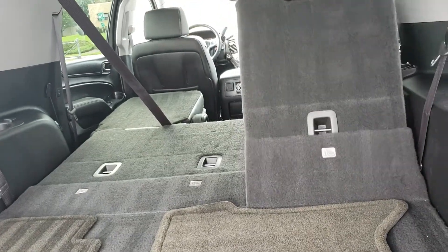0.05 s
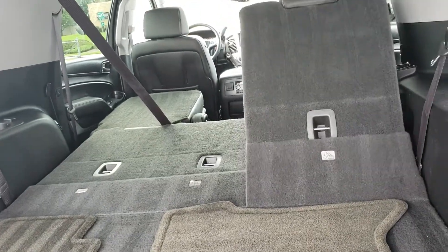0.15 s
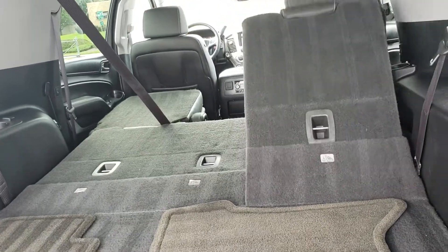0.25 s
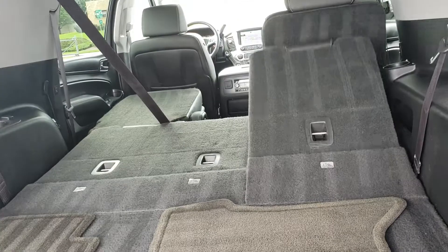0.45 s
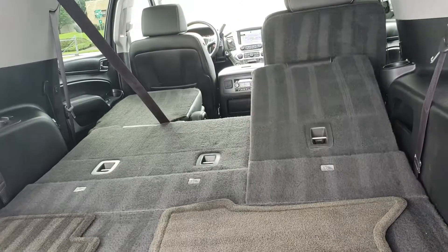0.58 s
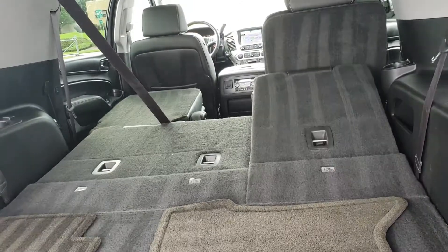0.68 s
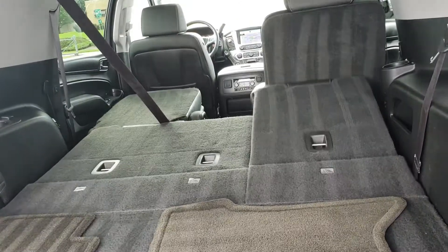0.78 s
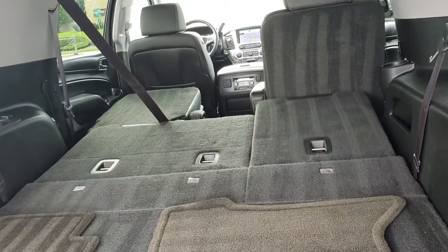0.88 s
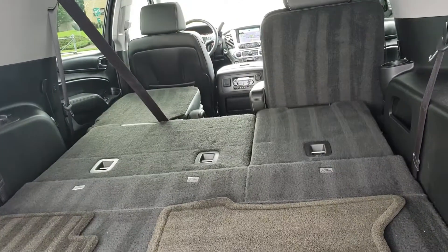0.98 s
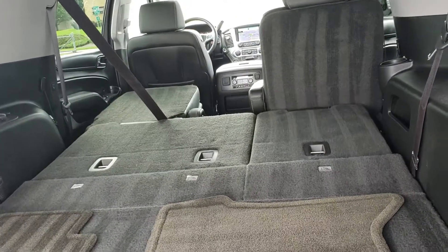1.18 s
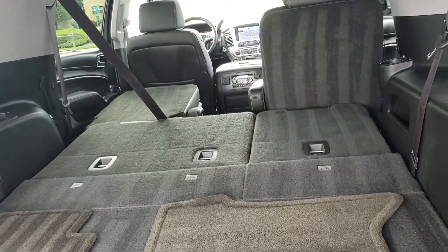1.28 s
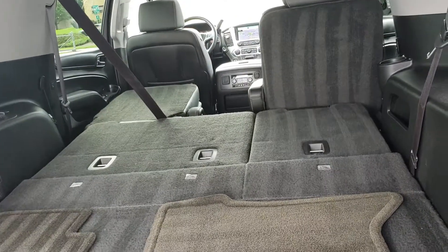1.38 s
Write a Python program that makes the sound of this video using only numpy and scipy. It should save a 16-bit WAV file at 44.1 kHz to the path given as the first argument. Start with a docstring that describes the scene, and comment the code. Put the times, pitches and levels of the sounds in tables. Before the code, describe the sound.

A seat latch snaps open with a sharp metallic clack, then the backrest folds with soft thumps

```python
"""A spring latch snaps open in a closed cabin: sharp noise bursts and short decaying steel tones.
The seat frame and cabin boom after it, as slowly swelling low sines behind a dull knock.
The backrest of the motorised seat folds flat: soft low noise pulses with a few faint ticks.
Behind lie wavering hum tones, filtered cabin rumble and a hiss that thins out, then returns.
A thin whistle, a narrow noise band on a climbing pitch, rises at the end."""
import sys
import numpy as np
from scipy import signal
from scipy.fft import rfft, irfft
from scipy.io import wavfile
from scipy.ndimage import uniform_filter1d

SR = 44100
rng = np.random.default_rng(int(sys.argv[2]) if len(sys.argv) > 2 else 0)


def to_wav(s):
    """Save 16-bit WAV."""
    ch = np.atleast_2d(s).T  # columns
    pcm = np.round(np.clip(ch, -1, 1) * 32767)  # PCM
    wavfile.write(sys.argv[1], SR, pcm.astype(np.int16))


N = 63945
T = np.arange(N) / SR
HZ = np.fft.rfftfreq(N, 1 / SR)

# All spectra are relative: noise() scales the result to an rms of one.
# Cabin rumble spectrum. Each row: frequency in Hz, density in dB per Hz.
RUMBLE_SPECTRUM = [(15, -47), (25, -8), (38, -4), (50, -3.5), (102, -3), (150, -3), (217, -7.5),
                   (354, -12.5), (451, -9), (531, -14.5), (754, -20), (1260, -25), (1600, -27.5),
                   (2000, -26.5), (2690, -36.5), (4490, -40), (5730, -49.5), (7510, -48.5), (8800, -63),
                   (16000, -84)]
# Rumble level ahead of the patches. Each row: time in seconds, level in dB.
RUMBLE_LEVEL = [(0, -37), (.35, -35.5), (.7, -38), (.92, -37.5), (1.2, -39.5), (1.45, -35)]
# Left-right likeness of all noise, ahead of the side arrival. Each row: frequency in Hz, coherence.
EAR_COHERENCE = [(60, .84), (150, .9), (380, 0.74), (950, -0.081), (1500, -0.056), (2400, 0.089),
                 (15000, -0.016)]
# Hiss spectrum. Each row: frequency in Hz, density in dB per Hz.
HISS_SPECTRUM = [(500, 0), (2000, 4.5), (4300, -6.5), (7500, -9), (9000, -13.5), (12000, -11), (16000, -18)]
# Hiss level. Each row: time in seconds, level in dB.
HISS_LEVEL = [(0, -55.5), (.12, -55), (.3, -56.5), (.5, -63.5), (.9, -65), (1.2, -71.5), (1.45, -59.5)]
# Hum tones. Each row: mean frequency in Hz, rms level in dB.
HUM_TONES = [(113, -50), (145, -47), (243, -55), (262, -52.5), (355, -53), (450, -57.5), (2840, -80.5)]
# Whistle course. Each row: time in seconds, centre frequency in Hz, level in dB.
WHISTLE_COURSE = [(1.26, 9360, -94), (1.33, 10400, -84), (1.40, 11700, -73), (1.45, 12100, -65)]
# Soft blows on the upholstery. Each row: start in seconds, level in dB, swell in seconds, t60 in seconds.
THUDS = [(0.218, -29.5, 0.0096, 0.36), (0.51, -40, 0.014, 0.2), (0.992, -32.5, 0.0094, 0.24)]
# Thud spectrum. Each row: frequency in Hz, density in dB per Hz.
THUD_SPECTRUM = [(30, -19), (60, -4), (105, 0), (190, -2.5), (330, 0), (500, -8), (800, -14), (1500, -26),
                 (4000, -43), (16000, -80)]
# Deep heaves of the backrest. Each row: start in seconds, level in dB, swell in seconds, t60 in seconds.
HEAVES = [(0.217, -32.5, 0.013, 0.13), (0.519, -32, 0.047, 0.11), (1.015, -30, 0.021, 0.21)]
# Heave spectrum. Each row: frequency in Hz, density in dB per Hz.
HEAVE_SPECTRUM = [(20, -32), (45, -12), (80, -3.5), (115, -4.5), (170, -18), (400, -53), (2000, -89)]
# Hinge and trim ticks. Each row: start in seconds, level in dB.
TICKS = [(0.352, -54), (0.491, -53), (0.515, -50.5), (0.654, -55), (0.825, -56), (0.952, -55), (1.272, -64),
         (1.347, -61)]
# Tick spectrum. Each row: frequency in Hz, density in dB per Hz.
TICK_SPECTRUM = [(300, -10), (1200, 7), (2700, 7), (5000, -3), (7500, -5.5), (10000, -16.5), (16000, -21)]
# Spectrum of the first knock. Each row: frequency in Hz, density in dB per Hz.
KNOCK_SPECTRUM = [(40, -22), (110, -0.5), (200, -7.5), (380, 2), (520, -2), (700, -19), (1250, -5.5),
                  (1700, -20), (6000, -62)]
# Modes of frame and cabin. Each row: frequency in Hz, level in dB, t60 in seconds, swell in seconds.
BOOM_MODES = [(118.6, -26, 0.51, 0.044), (241.7, -27.5, 0.46, .034), (306, -26.5, 0.42, 0.033),
              (357.6, -24.5, 0.13, 0.034), (456.4, -27.5, 0.17, 0.019), (547.2, -32.5, 0.33, .014)]
# Latch blows. Each row: start in seconds, level in dB ahead of CLATTER_GAIN_DB.
LATCH_BLOWS = [(0.2156, -5.5), (0.2163, -0.5), (0.221, -5.5)]
# Clatter spectrum. Each row: frequency in Hz, density in dB per Hz.
CLATTER_SPECTRUM = [(240, -21), (400, -4), (700, -20.5), (1100, -11), (1500, -7.5), (2000, 6), (2800, 3),
                    (3600, 3), (4900, -3), (6100, -8), (7600, -10), (8800, -16.5), (16000, -20)]
# Clatter decay. Each row: frequency in Hz, t60 in seconds.
CLATTER_DECAY = [(500, 0.15), (1500, 0.09), (3500, 0.065), (7000, 0.069), (14000, 0.067)]
# Clatter lean. Each row: frequency in Hz, left minus right in dB.
CLATTER_LEAN = [(600, 2), (1300, -4), (2400, -0.5), (4400, 0.5), (8000, 8.5), (14000, -3)]
# Steel modes. Each row: frequency in Hz, level in dB ahead of STEEL_GAIN_DB, t60 in seconds,
# left minus right in dB.
STEEL_MODES = [(856, -31, .17, -11), (1692, -26, .12, -1), (1778, -21, .1, -10), (1960, -22, .085, -15),
               (2233, -20, .08, -2), (2638, -19, .085, -11), (2840, -20, .095, -8), (3413, -18, .08, 9),
               (4660, -26, .07, 11), (5286, -17, .07, 3), (5895, -24, .06, 10), (6610, -24, .075, 14),
               (7350, -32, .065, -1), (9405, -37, .1, 2)]

SIDE_SHARE, SIDE_LAG_S = 0.13, 0.000426
PATCH_RMS_DB = 1.5
HUM_WANDER_RMS_HZ, HUM_WANDER_RATE_HZ = 2.87, 7.34
HUM_FLUTTER_RMS, HUM_FLUTTER_RATE_HZ = 0.48, 9.3
WHISTLE_WIDTH_HZ = 380
TICK_RISE_S, TICK_T60_S = 0.004, 0.11
KNOCK_DB, KNOCK_RISE_S, KNOCK_T60_S = -22.5, 0.0022, 0.11
BOOM_START_S, BOOM_LEFT_LAG_S = 0.2175, 0.00006
CLATTER_GAIN_DB, CLATTER_RISE_S = -10.5, 0.00081
TAIL_DB, TAIL_T60_S = -33, 0.39  # level relative to the clatter
STEEL_GAIN_DB, STEEL_RISE_S = -2, 0.003
CEILING, BAND_EDGE_HZ = 0.77, 16300


def amp(db):
    """Decibels to gain."""
    return 10 ** (np.asarray(db) / 20)


def unit(x):
    """Scales to an rms of one."""
    return x / np.sqrt(np.mean(x ** 2) + 1e-20)


def by_hz(points, hz):
    """Reads a table on a log-frequency axis."""
    f, value = np.transpose(points)
    return np.interp(np.log(hz + 1), np.log(f + 1), value)


def by_time(points, axis=1):
    """Reads one column of a control curve at every sample."""
    columns = np.transpose(points)
    return np.interp(T, columns[0], columns[axis])


def fade(t, t60):
    """Exponential decay from time zero, 60 dB in t60."""
    return np.exp(-np.log(1000) * np.maximum(t, 0) / t60)


def strike(start, rise, t60):
    """Envelope that swells linearly from the start, then dies away."""
    swell = np.clip((T - start) / rise, 0, 1)
    return swell * fade(T - start - rise, t60)


def drift(rate_hz):
    """Random motion of rms one, low-passed by a Gaussian of the given width."""
    lowpass = np.exp(-(HZ / rate_hz) ** 2)
    return unit(irfft(rfft(rng.standard_normal(N)) * lowpass, N))


def noise(spectrum):
    """Coloured stereo noise: alike in both ears in the bass, else diffuse with a part from the right."""
    left, other = rfft(rng.standard_normal((2, N)))
    same = np.clip(by_hz(EAR_COHERENCE, HZ), -1, 1)
    from_right = np.clip(SIDE_SHARE, 0, 1) * np.exp(2j * np.pi * HZ * SIDE_LAG_S)
    same = same + (1 - abs(same)) * from_right
    right = same * left + np.sqrt(np.maximum(1 - abs(same) ** 2, 0)) * other
    return unit(irfft(np.array([left, right]) * amp(by_hz(spectrum, HZ)), N))


def cabin():
    """Low rumble with patches drifting over time and frequency, and a soft hiss above it."""
    z = signal.stft(noise(RUMBLE_SPECTRUM), nperseg=1024)[2]
    patches = rng.standard_normal(z.shape[1:])
    patches = uniform_filter1d(patches, size=10, axis=0)  # across frequency
    patches = unit(uniform_filter1d(patches, size=5, axis=1))  # across time
    rumble = signal.istft(z * amp(PATCH_RMS_DB * patches), nperseg=1024)[1][:, :N]
    hiss = noise(HISS_SPECTRUM) * amp(by_time(HISS_LEVEL))
    return rumble * amp(by_time(RUMBLE_LEVEL)) + hiss


def hum():
    """Low machine tones and a faint higher one, each wavering in pitch and strength."""
    out = np.zeros(N)
    for hz, db in HUM_TONES:
        pitch_hz = hz + HUM_WANDER_RMS_HZ * drift(HUM_WANDER_RATE_HZ)
        turns = np.cumsum(pitch_hz) / SR + rng.random()
        flutter = 1 + HUM_FLUTTER_RMS * drift(HUM_FLUTTER_RATE_HZ)
        out += amp(db) * unit(flutter * np.sin(2 * np.pi * turns))
    return out


def whistle():
    """Two slow noises per ear modulate a climbing carrier: a thin, fuzzy, growing whistle."""
    angle = 2 * np.pi * np.cumsum(by_time(WHISTLE_COURSE)) / SR
    ears = []
    for _ in range(2):
        in_phase = drift(WHISTLE_WIDTH_HZ) * np.cos(angle)
        quadrature = drift(WHISTLE_WIDTH_HZ) * np.sin(angle)
        ears.append(in_phase + quadrature)
    started = T > WHISTLE_COURSE[0][0]
    return unit(np.array(ears)) * amp(by_time(WHISTLE_COURSE, axis=2)) * started


def pulses(rows):
    """Sums the envelopes of a table of soft blows."""
    return sum(amp(db) * strike(start, swell, t60) for start, db, swell, t60 in rows)


def backrest():
    """Padded thuds and deep heaves as the backrest is freed, swings and lands, with small ticks."""
    ticks = sum(amp(db) * strike(start, TICK_RISE_S, TICK_T60_S) for start, db in TICKS)
    soft = pulses(THUDS) * noise(THUD_SPECTRUM) + pulses(HEAVES) * noise(HEAVE_SPECTRUM)
    return soft + ticks * noise(TICK_SPECTRUM)


def boom():
    """A dull knock as the latch lets go; low modes of frame and cabin then swell and ring on."""
    t = np.array([T - BOOM_LEFT_LAG_S, T]) - BOOM_START_S
    out = amp(KNOCK_DB) * strike(BOOM_START_S, KNOCK_RISE_S, KNOCK_T60_S) * noise(KNOCK_SPECTRUM)
    for hz, db, t60, swell in BOOM_MODES:
        out += amp(db) * strike(BOOM_START_S, swell, t60) * np.sin(2 * np.pi * hz * t)
    return out


def latch_clatter():
    """Dense cabin reflections smear each blow into a crack with a faint tail."""
    crack = np.zeros((2, N))
    for start, db in LATCH_BLOWS:
        hz, t, z = signal.stft(noise(CLATTER_SPECTRUM), SR, nperseg=128)
        decay = fade(t - start, by_hz(CLATTER_DECAY, hz)[:, None])
        tail = amp(TAIL_DB) * fade(t - start, TAIL_T60_S)
        clatter = signal.istft(z * (decay + tail), SR, nperseg=128)[1][:, :N]
        onset = np.clip((T - start) / CLATTER_RISE_S, 0, 1)
        crack += amp(db + CLATTER_GAIN_DB) * clatter * onset
    half_lean_db = by_hz(CLATTER_LEAN, HZ) / 2
    return irfft(rfft(crack) * amp([half_lean_db, -half_lean_db]), N)


def latch_steel():
    """The first blow rings the steel: decaying sines, each with its own pan and random phases."""
    out = np.zeros((2, N))
    for hz, db, t60, pan_db in STEEL_MODES:
        pan = unit(amp([[pan_db], [0]]))
        ring = pan * np.sin(2 * np.pi * (hz * T + rng.random((2, 1))))
        out += amp(STEEL_GAIN_DB + db) * strike(LATCH_BLOWS[0][0], STEEL_RISE_S, t60) * ring
    return out


def latch():
    """Quick blows: clatter plus ringing steel."""
    return latch_clatter() + latch_steel()


def scene():
    """All sounds in the cabin."""
    return cabin() + hum() + whistle() + backrest() + boom() + latch()


def record(dry):
    """Rounds off the highest peaks smoothly, then low-passes."""
    rounded = dry / (1 + (dry / CEILING) ** 6) ** (1 / 6)
    lowpass = signal.firwin(255, BAND_EDGE_HZ, window=("kaiser", 9), fs=SR)
    return signal.oaconvolve(rounded, lowpass[None], "same")


dry = scene()
out = record(dry)
to_wav(out)
```